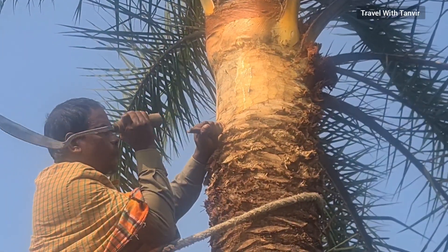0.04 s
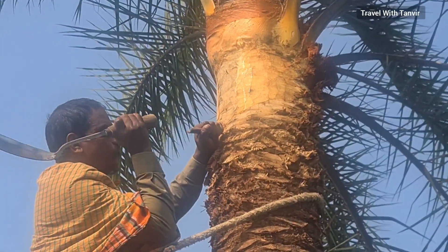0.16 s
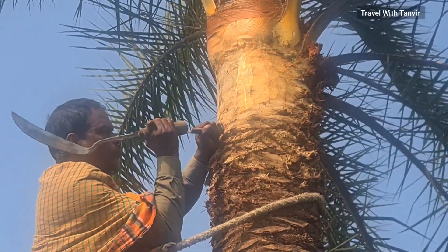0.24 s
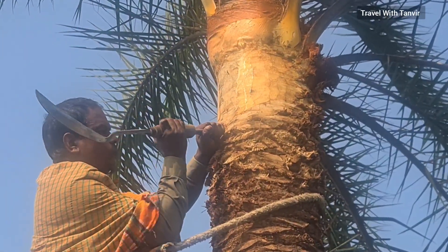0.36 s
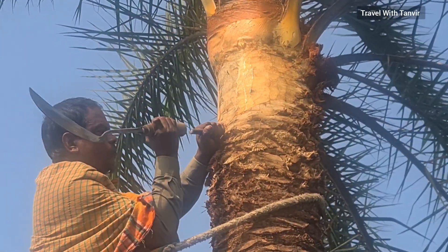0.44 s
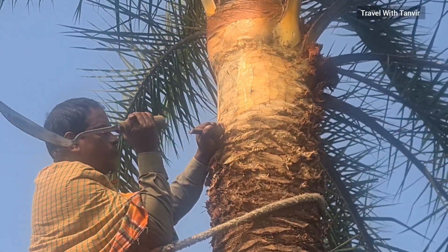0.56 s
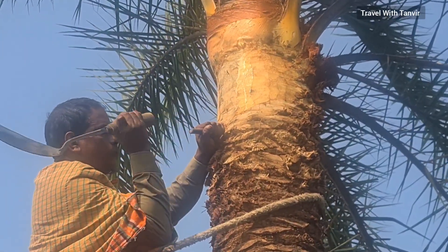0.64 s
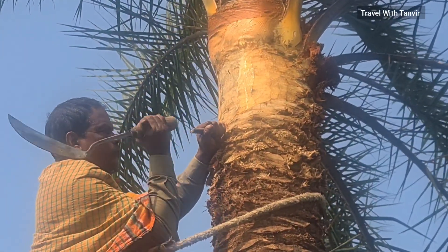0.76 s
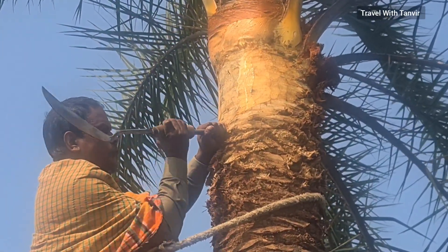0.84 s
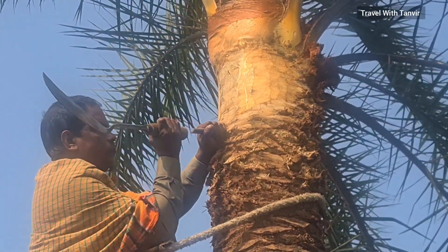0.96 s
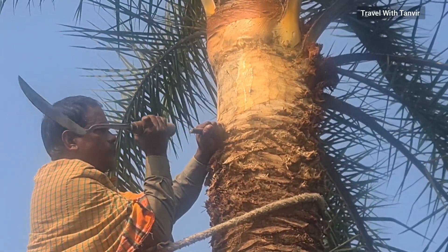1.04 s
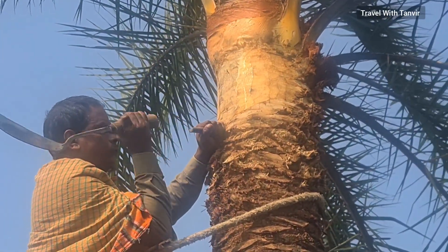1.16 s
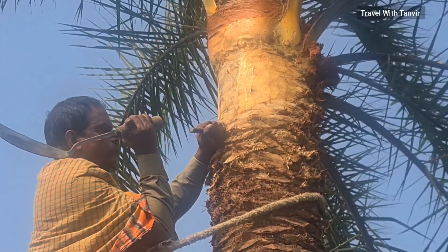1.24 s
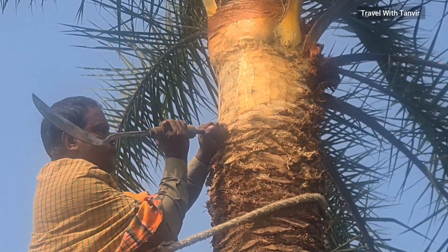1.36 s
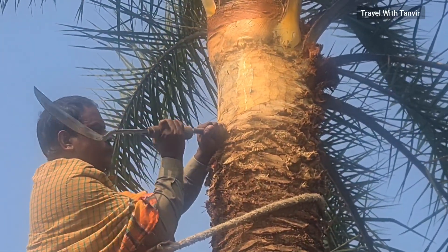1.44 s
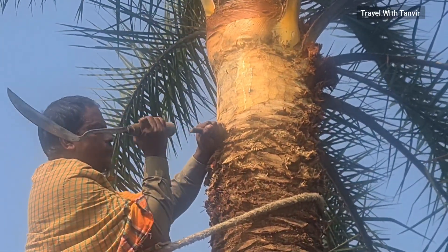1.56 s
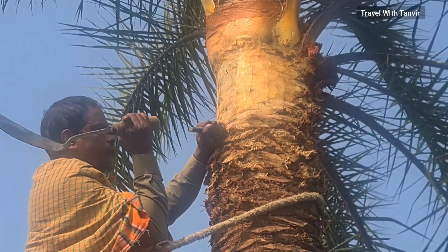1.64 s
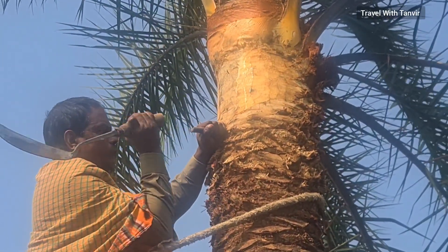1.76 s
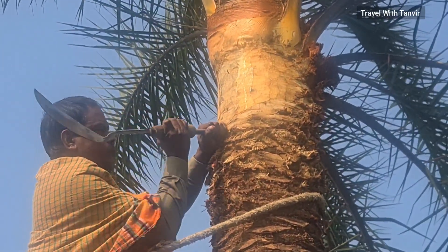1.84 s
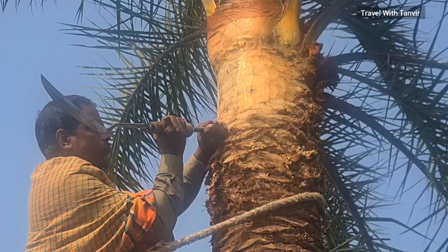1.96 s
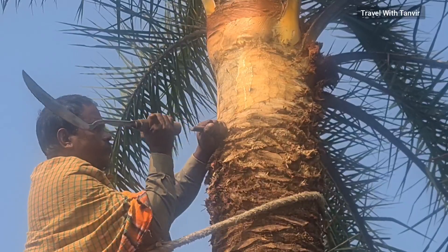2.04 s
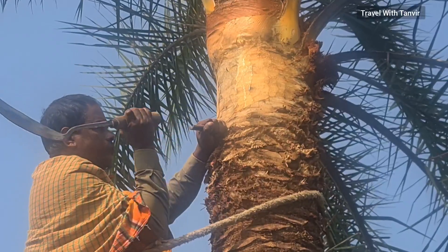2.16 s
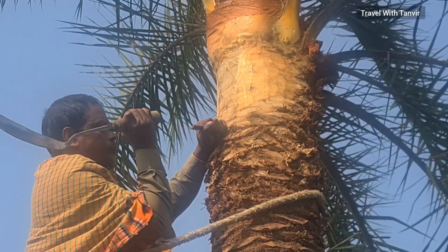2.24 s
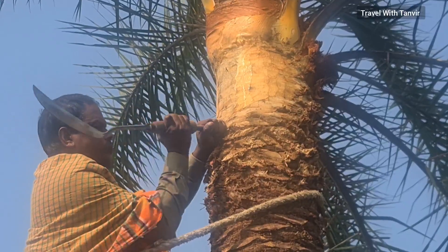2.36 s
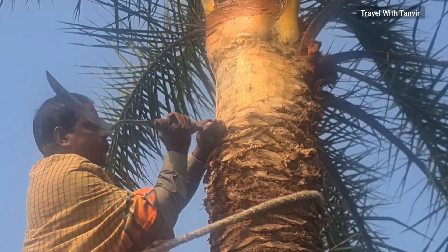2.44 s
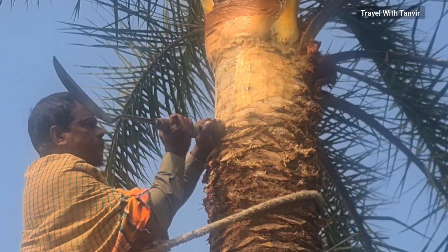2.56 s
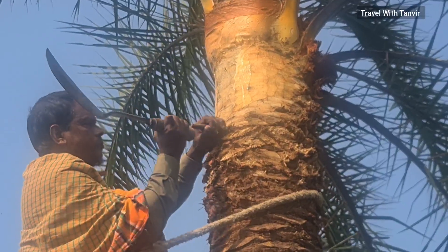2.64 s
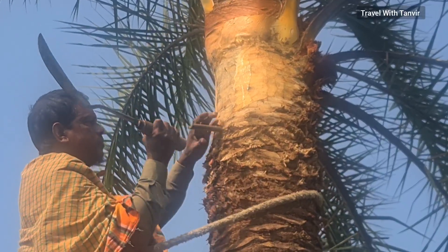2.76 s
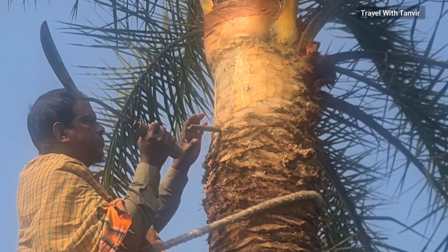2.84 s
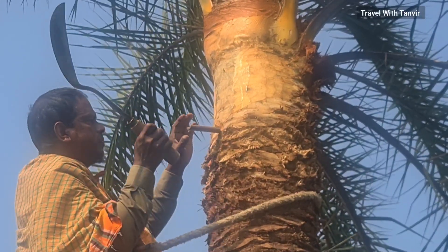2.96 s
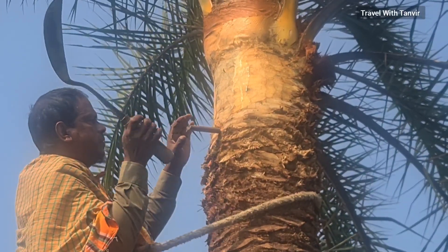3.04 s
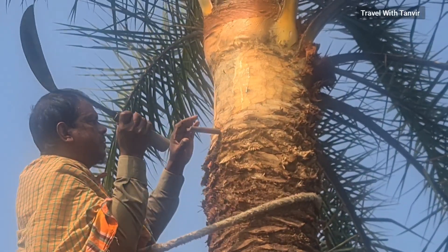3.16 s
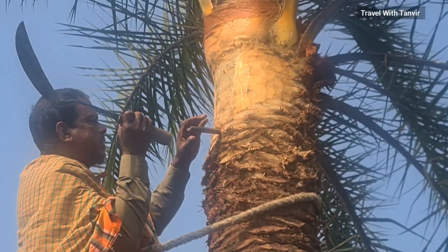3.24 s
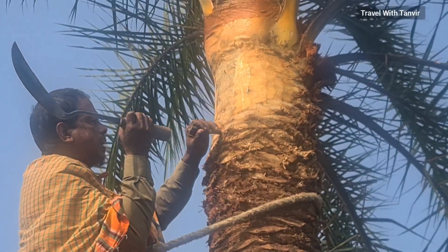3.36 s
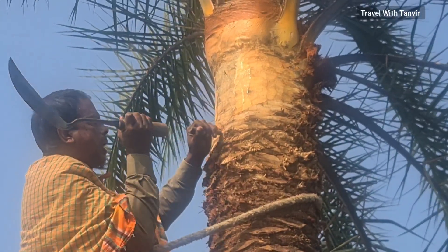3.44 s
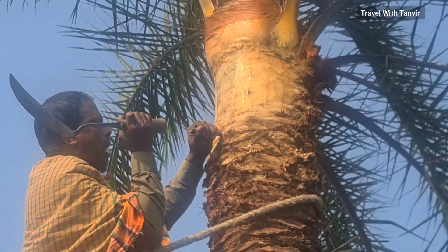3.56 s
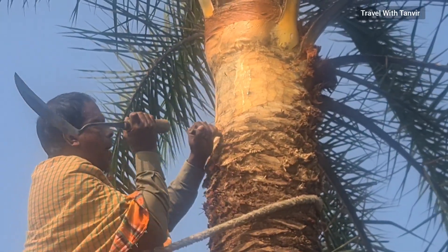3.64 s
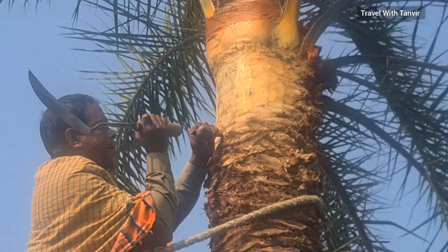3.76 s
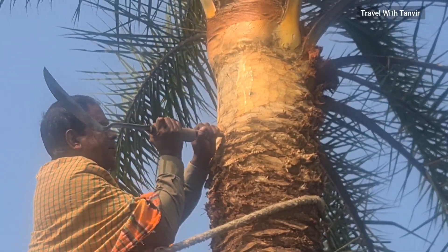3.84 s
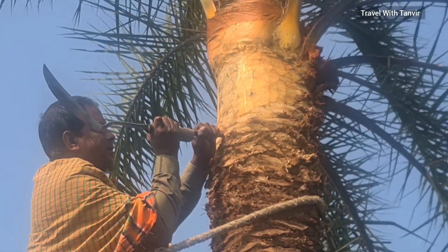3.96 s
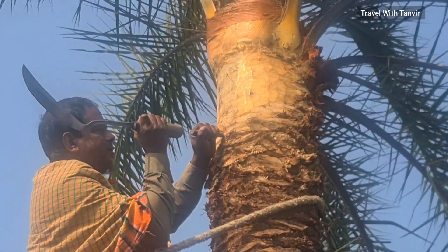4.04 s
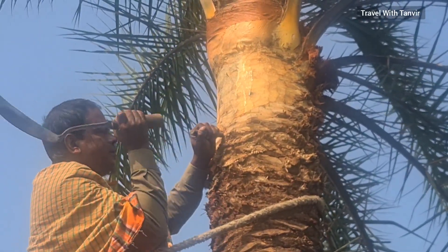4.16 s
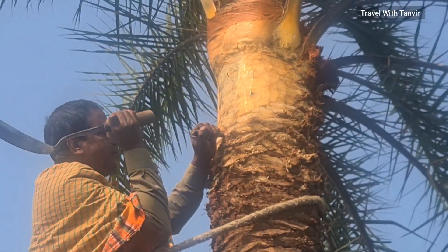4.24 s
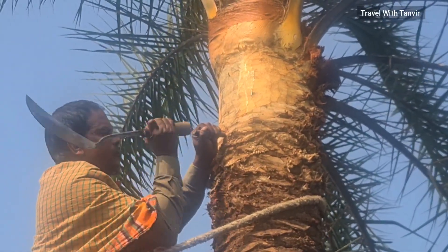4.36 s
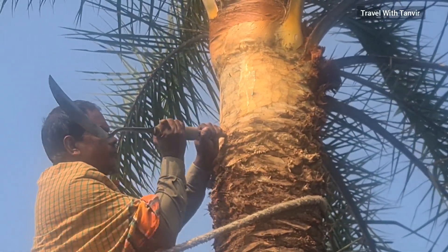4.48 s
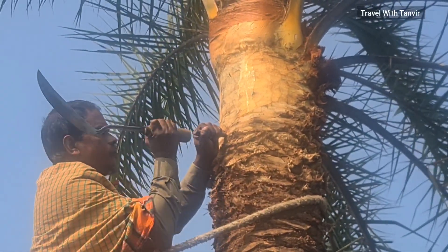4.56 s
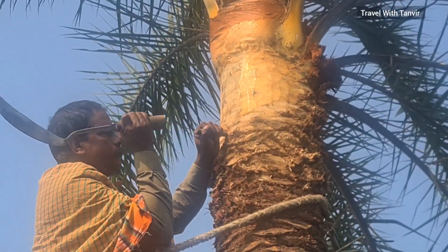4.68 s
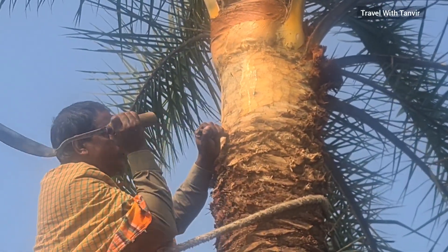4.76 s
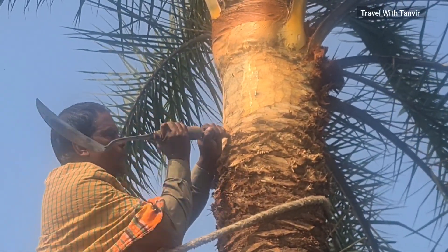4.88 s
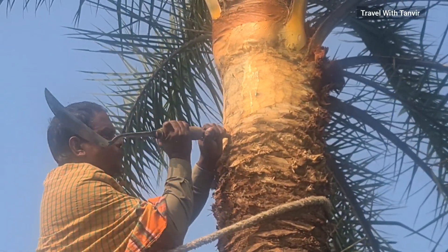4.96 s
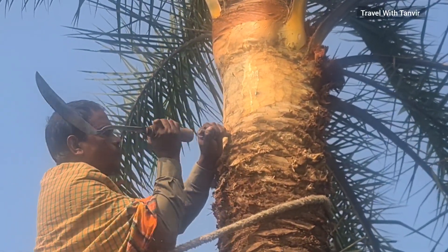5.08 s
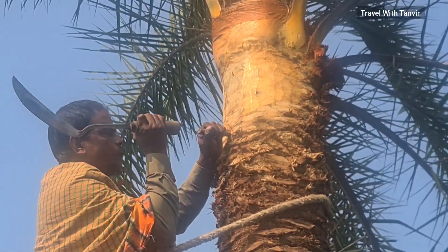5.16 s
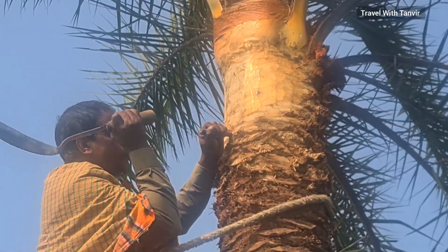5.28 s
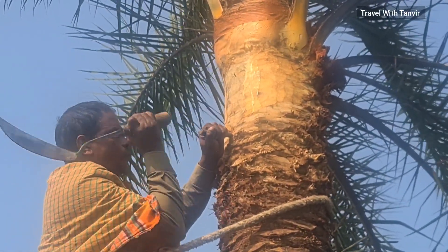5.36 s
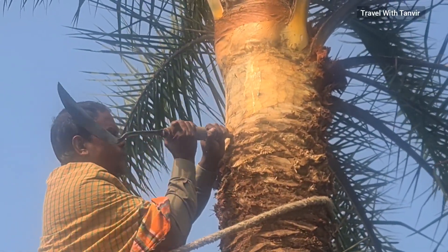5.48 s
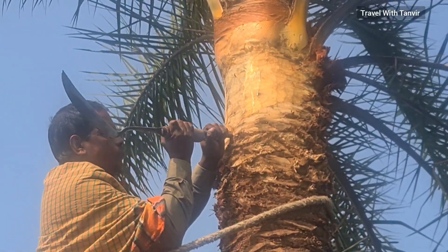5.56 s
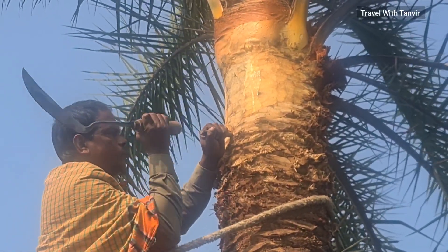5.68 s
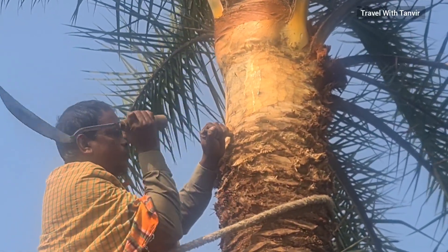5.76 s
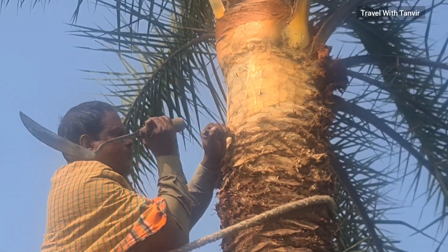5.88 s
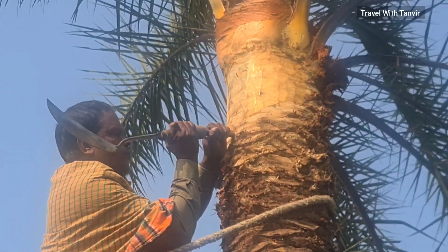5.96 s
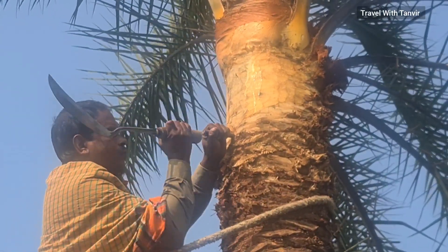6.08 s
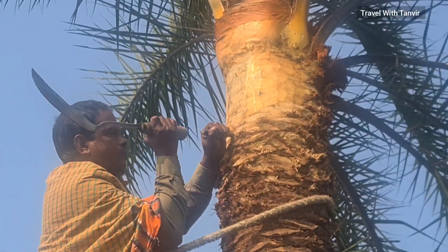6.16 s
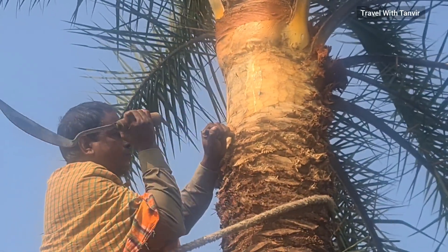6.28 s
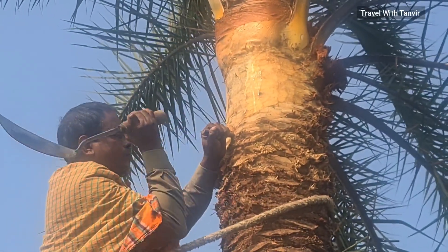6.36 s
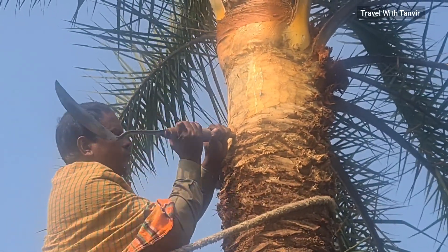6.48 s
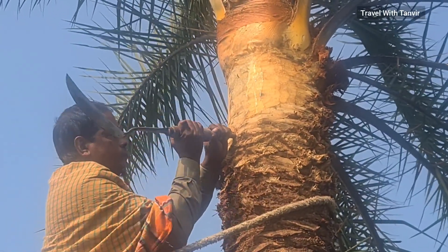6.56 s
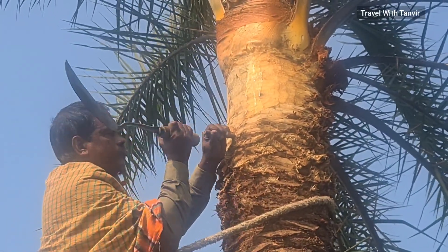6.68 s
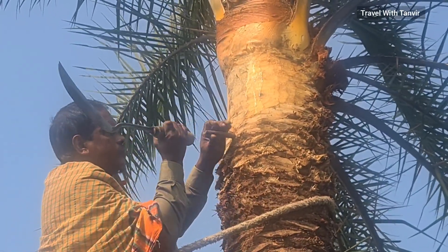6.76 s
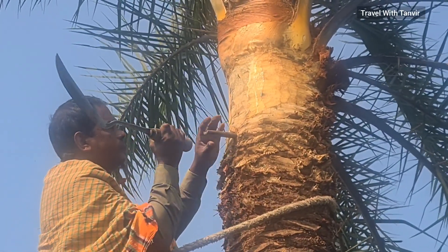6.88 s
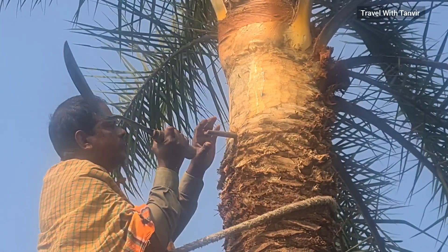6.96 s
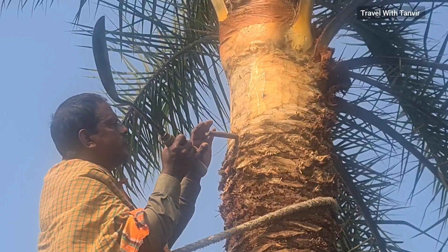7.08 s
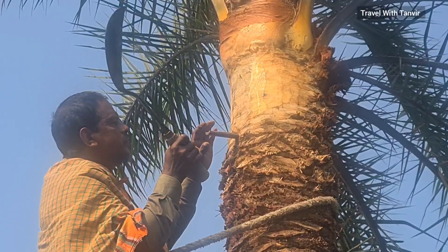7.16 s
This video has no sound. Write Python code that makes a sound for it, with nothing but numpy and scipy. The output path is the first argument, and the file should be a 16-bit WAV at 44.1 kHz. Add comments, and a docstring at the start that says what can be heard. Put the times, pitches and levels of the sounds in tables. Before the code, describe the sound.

Sharp wooden knocks, about two a second, drive a bamboo tube into a palm trunk outdoors, pausing midway, while small birds whistle nearby.

```python
"""Hard wooden knocks: a sickle's handle drives a bamboo spout into a date palm, five blows, a pause, a light tap, five more.
Each blow is a noise crack, decaying tube modes and a trunk thud; the knock deepens as the tube seats.
Filtered echoes and decaying noise throw it back from the ground, fronds and far surfaces.
Small birds whistle nearby in gliding sines, and noise bursts click as the tube is handled.
Behind lie hissing fronds, a low rumble and faint hiss of shaped noise, and a far engine, probably a water pump, in sines."""
import sys
import numpy as np
from scipy import signal
from scipy.fft import rfft, irfft, next_fast_len
from scipy.io import wavfile

SR = 44100
rng = np.random.default_rng(int(sys.argv[2]) if len(sys.argv) > 2 else 0)


def to_wav(sig):
    """Store sig (one row per channel, or 1-D mono) as 16-bit WAV at the path in sys.argv[1].

    Samples outside -1..1 are clipped; the rate is SR.
    """
    pcm = np.clip(np.atleast_2d(sig), -1, 1) * 32767
    pcm = np.round(pcm).astype(np.int16)
    wavfile.write(sys.argv[1], SR, pcm.T)  # frames by channels


N = 318402

# colour of the rumble and hiss, before their overall level is set: (frequency [Hz], relative density [dB per Hz])
BED_COLOUR = [(25, -18.5), (50, -1), (110, -9.5), (170, -18), (300, -26), (600, -30.5), (1050, -27),
              (2300, -36), (4000, -37), (5200, -49), (6700, -35.5), (7300, -27), (7600, -39), (7950, -61),
              (16000, -60.5)]
# how alike the rumble and hiss are at left and right: (frequency [Hz], correlation [-1 to 1])
BED_LIKENESS = [(60, 0.95), (180, 0.98), (550, 0.41), (1650, -0.0096), (4970, -0.16), (15000, 0.13)]
# exhaust of the far engine, before fading: (multiple of the firing rate, level [dB rms])
EXHAUST_ORDERS = [(4, -51), (5, -51), (6, -48), (7, -54), (9, -57.5), (12, -61)]
# faint machine whine, before fading: (frequency [Hz], level [dB rms])
WHINE_TONES = [(398.4, -70), (748.3, -74), (845.2, -76), (872.1, -72), (995.9, -70), (1244, -73)]
# a breeze stirs the fronds, before flutter: (time [s], level [dB rms])
BREEZE = [(0, -74), (1, -69), (1.7, -61.5), (4.8, -65), (5.6, -67.5), (7.2, -65)]
# colour of the frond hiss: (frequency [Hz], relative density [dB per Hz])
FROND_COLOUR = [(1500, -53), (3000, 1), (5000, 5.5), (6800, 1.5), (7600, -5), (8200, -40), (11000, -15),
                (16000, -18)]
# slurred whistles of the nearest bird: (time [s], length [s], start [Hz], end [Hz], level [dB])
WHISTLES = [(0.799, 0.14, 4070, 4950, -46), (2.246, 0.16, 4090, 5400, -44.5),
            (2.572, 0.047, 5410, 5400, -56), (4.149, 0.14, 3070, 3960, -55.5),
            (4.253, 0.13, 3920, 5310, -45.5), (4.588, 0.11, 5010, 5130, -45.5),
            (4.672, 0.046, 5500, 5570, -43.5), (4.732, .06, 5600, 5540, -59),
            (4.887, 0.19, 4260, 5350, -45), (5.37, 0.17, 4380, 4700, -55),
            (6.067, 0.095, 4460, 5300, -52.5), (6.331, 0.06, 5650, 5640, -60)]
# short, high, rising chirps: (time [s], level [dB])
CHIRPS = [(2.159, -44), (4.215, -56.5), (5.455, -51)]
# a second bird's cheep, dipping and rising again: (time [s], level [dB])
CHEEPS = [(3.064, -50.5), (3.441, -53), (3.778, -52.5)]
# quick falling chips: (time [s], level [dB])
CHIPS = [(2.881, -58), (3.035, -53), (5.84, -47.5)]
# small ticks as the tube is handled: (time [s], relative level [dB])
TICKS = [(3.374, -45), (3.4233, -38.5), (4.295, -55.5), (7.121, -51)]
# far reflectors, each returning one band: (delay [s], level [dB], centre [Hz], width [Hz])
ECHOES = [(0.0878, -19.5, 758, 56), (0.09, -35, 2200, 895), (0.1348, -19.5, 510, 50.4)]
# scatter from fronds and ground: (frequency [Hz], early level [dB], late level [dB], late t60 [s])
SCATTER = [(260, 5, -9.5, 1), (533, -10, -23.5, 0.92), (900, -13.5, -34, 1), (2670, -7.5, -23, 0.52),
           (6450, -2, -19, 0.5), (9000, -4, -8.5, 0.25), (14800, -16, -7, 0.19)]
# relative colour of the contact crack: (frequency [Hz], density [dB per Hz])
CRACK_COLOUR = [(400, -38), (1500, -6), (3000, 3.5), (4300, -3), (6300, -2.5), (7500, -10.5), (10000, -15),
                (12500, -13), (16000, -22.5)]
# modes of tube, handle and trunk, before the low cut:
# (frequency [Hz], level with the tube shallow [dB], level with it deep [dB], t60 [s])
MODES = [(396.7, -27.5, -31, 0.12), (513, -19.5, -11.5, 0.038), (616, -11, -4, 0.014),
         (901, -15.5, -10, 0.041), (1052, -22, -16, 0.036), (1156, -21.5, -16, 0.037),
         (1415, -18.5, -18.8, 0.035), (1597, -20.5, -18, 0.021), (1907, -13, -17.5, 0.016),
         (2187, -17.5, -25, 0.017), (2379, -28.5, -18.5, 0.022), (2836, -19, -13.5, 0.014),
         (3160, -16, -16.5, 0.014), (3580, -12, -14.5, 0.0072), (4026, -13.5, -18, 0.009),
         (4730, -18.5, -16.5, 0.0079), (5720, -17, -20, 0.0038), (6920, -12, -36, 0.0044)]
# dull trunk modes, relative to the thud level: (frequency [Hz], level [dB], t60 [s])
TRUNK_MODES = [(242, -9.5, 0.04), (497, 2, 0.015)]
# the blows: (time [s], force [dB], crack relative to the blow [dB], brightness above 1.5 kHz [dB per octave])
BLOWS = [(.3424, 1.5, -1, -8), (0.8792, 1.5, -1.5, .5), (1.3915, 2, -2, 0), (1.8995, 1.5, -1, 1.2),
         (2.398, 1.6, 0, 1), (3.9111, -14.5, -26, -7), (4.4572, 2.45, -2.5, 0.5), (4.9791, 3, -2.5, -0.5),
         (5.4973, 3.5, -5.5, 0), (6.011, 4, -6.5, -2), (6.524, 3, -6.5, -1.5)]
# level of the blows at the left relative to the right: (frequency [Hz], level [dB])
LEFT_TILT = [(200, 0.7), (1200, 2), (2800, -2), (5500, -8), (10000, -5.5), (14000, -11)]

WHISTLE_BOW = 0.19  # share of its climb by which a whistle is ahead at half time
CHIRP_LENGTH_S, CHIRP_START_HZ, CHIRP_END_HZ = 0.054, 5400, 6400
CHEEP_LENGTH_S, CHEEP_HZ, CHEEP_DIP_HZ = 0.0507, 3450, 473
CHIP_LENGTH_S, CHIP_TOP_HZ, CHIP_END_HZ = 0.023, 7400, 5040
# quaver as a share of the pitch: whistles and cheeps are nearly pure, chirps and chips buzz
WHISTLE_WAVER, CHIRP_WAVER = 0.021, 0.051
BOUNCE_S = 0.0087  # delay of the near bounce
# depth of the tube (about 0 shallow, 1 deep): at the start, and what a blow of 0 dB adds
START_DEPTH, DRIVE_PER_BLOW = 0.14, 0.081
# thud relative to the blow: shallow [dB], gain as the tube seats [dB per depth], loss [dB per dB of force]
THUD_DB, THUD_SEATED_DB, THUD_LOSS = -37, 20, 1.17
EDGE_HZ = 16200  # cutoff of the final low-pass


def amp(db):
    """Decibels to gain."""
    return 10 ** (np.asarray(db) / 20)


def unit(x):
    """Scales to rms 1."""
    return x / np.sqrt(np.mean(x ** 2) + 1e-20)


def read(table, hz, axis=1):
    """One column of a table, joined by lines over log frequency."""
    columns = np.transpose(table)
    return np.interp(np.log(hz + 1), np.log(columns[0] + 1), columns[axis])


def colour(x, table, axis=1):
    """Filters x by a table of dB over frequency."""
    length = x.shape[-1]
    size = next_fast_len(length + 512)
    gain = amp(read(table, np.fft.rfftfreq(size, 1 / SR), axis=axis))
    return irfft(rfft(x, size) * gain, size)[..., :length]


def cut(x, hz, kind, order=2):
    """Causal low-pass or high-pass."""
    sos = signal.butter(order, min(hz, SR / 2 - 1), kind, fs=SR, output="sos")
    return signal.sosfilt(sos, x)


def add(mix, s, sound):
    """Mixes a sound in at time s."""
    part = mix[..., max(round(s * SR), 0):][..., :sound.shape[-1]]
    part += sound[..., :part.shape[-1]]


def delayed(x, s):
    """The same sound s seconds later."""
    out = np.zeros_like(x)
    add(out, s, x)
    return out


def drift(rate, size=N):
    """Random wander: normal values drawn at rate per second, joined by lines."""
    at = np.arange(size) * rate / SR
    return np.interp(at, np.arange(4096), rng.standard_normal(4096))


def rumble_and_hiss(level_db=-46, swell_db=2.13):
    """Low rumble of open country under a faint hiss: shaped noise, more alike in the bass, swelling."""
    a, b = rfft(rng.standard_normal((2, N)))
    hz = np.fft.rfftfreq(N, 1 / SR)
    same = np.clip(read(BED_LIKENESS, hz), -1, 1)
    right = same * a + np.sqrt(1 - same ** 2) * b
    noise = irfft(np.array([a, right]) * amp(read(BED_COLOUR, hz)), N)
    return amp(level_db + swell_db * drift(2.79)) * unit(cut(noise, 21, "high"))


def engine(firing_hz=12.4, wander=0.0063, fade_db=3.0, whine_wander=0.00237):
    """Only low exhaust orders and a thin whine carry this far, fading in the moving air."""
    turns = np.cumsum(firing_hz * (1 + wander * drift(1.913))) / SR
    thud, whine = 0, 0
    for order, db in EXHAUST_ORDERS:
        level = amp(db + fade_db * drift(6.4))
        thud = thud + level * np.sin(2 * np.pi * (round(order) * turns + rng.random()))
    for hz, db in WHINE_TONES:
        level = amp(db + fade_db * drift(4.4))
        cycles = np.cumsum(hz * (1 + whine_wander * drift(12))) / SR
        whine = whine + level * np.sin(2 * np.pi * cycles)
    return np.sqrt(2) * (thud + whine)  # sine rms to peak


def rustle(flutter_db=1.5):
    """A thin, fluttering hiss of palm fronds: shaped noise following the breeze."""
    level_db = np.interp(np.arange(N) / SR, *np.transpose(BREEZE)) + flutter_db * drift(14)
    return amp(level_db) * unit(colour(rng.standard_normal((2, N)), FROND_COLOUR))


def foliage(x, direct_db=-2, wet_db=-7, t60=0.58):
    """Leaves smear sounds from deep in the trees: a decaying noise tail joins the direct sound."""
    t = np.arange(SR // 2) / SR
    tail = rng.standard_normal((2, len(t))) * amp(-60 * t / t60)
    smeared = signal.fftconvolve(x, tail / np.linalg.norm(tail[0]), axes=1)[:, :N]
    return amp(direct_db) * x + amp(wet_db) * smeared


def note(length, first_hz, last_hz, bow_hz, db, waver, flutter_db=4):
    """A thin note gliding along an arc, bow_hz off the straight line at half time, with a quaver."""
    u = np.linspace(0, 1, int(length * SR))
    arc_hz = first_hz + (last_hz - first_hz) * u + bow_hz * (1 - (2 * u - 1) ** 2)
    hz = arc_hz * (1 + waver * drift(671, size=len(u)))
    swell = np.sin(np.pi * u).clip(0) * amp(db + flutter_db * drift(90, size=len(u)))
    return swell * np.sin(2 * np.pi * np.cumsum(hz) / SR)


def birds(pan_db=-1):
    """Slurred whistles, rising chirps, dipping cheeps and falling chips, set slightly to the right."""
    out = np.zeros(N)
    for s, length, first_hz, last_hz, db in WHISTLES:
        bow_hz = WHISTLE_BOW * (last_hz - first_hz)
        add(out, s, note(length, first_hz, last_hz, bow_hz, db, WHISTLE_WAVER))
    for s, db in CHIRPS:
        add(out, s, note(CHIRP_LENGTH_S, CHIRP_START_HZ, CHIRP_END_HZ, 0, db, CHIRP_WAVER))
    for s, db in CHEEPS:
        add(out, s, note(CHEEP_LENGTH_S, CHEEP_HZ, CHEEP_HZ, -CHEEP_DIP_HZ, db, WHISTLE_WAVER))
    for s, db in CHIPS:
        add(out, s, note(CHIP_LENGTH_S, CHIP_TOP_HZ, CHIP_END_HZ, 0, db, CHIRP_WAVER))
    return out * amp([[pan_db / 2], [-pan_db / 2]])


def ticks(decay_s=0.0056):
    """Dry, thin clicks of bamboo against bark: treble noise dying in milliseconds."""
    out, t = np.zeros((2, N)), np.arange(SR // 30) / SR
    for s, db in TICKS:
        hiss = cut(rng.standard_normal((2, len(t))), 5300, "high")
        add(out, s, amp(db) / 2 * hiss * np.exp(-t / decay_s))
    return out


def reflections(x, bounce_s, bounce_db=-8, bounce_edge_hz=850):
    """One near bounce, strongest in the treble, and narrow echoes from far surfaces."""
    out = amp(bounce_db) * delayed(cut(x, bounce_edge_hz, "high", order=1), bounce_s)
    for s, db, hz, width_hz in ECHOES:
        band = signal.lfilter(*signal.iirpeak(hz, hz / width_hz, fs=SR), x)
        out += amp(db) * delayed(band, s)
    return out


def scatter(x, early_t60=0.091, onset_s=0.0052, apart_hz=1200):
    """Quick scatter from the fronds and a faint open-air tail: coloured noise convolved with the sound."""
    t = np.arange(SR // 2) / SR
    mid, side = rng.standard_normal((2, 2, len(t)))
    side = cut(side, apart_hz, "high", order=1)  # left and right share the bass
    early, late = np.stack([mid + side, mid - side], 1)
    early = early * amp(-60 * t / early_t60) * (1 - np.exp(-(t / onset_s) ** 2))
    # the late part dies at a different rate in each band
    hz, at, bands = signal.stft(late, SR, nperseg=256)
    fade = amp(-60 * at / read(SCATTER, hz, axis=3)[:, None])
    late = signal.istft(bands * fade, SR, nperseg=256)[1][:, :len(t)]
    late = late * (1 - np.exp(-t / 0.005))
    early_tail = colour(early / np.linalg.norm(early[0]), SCATTER, axis=1)
    late_tail = colour(late / np.linalg.norm(late[0]), SCATTER, axis=2)
    return signal.fftconvolve(x, early_tail + late_tail, axes=1)[:, :x.shape[1]]


def crack(burst_s=0.00086, rise_s=0.00085, same=0.91):
    """Fibres crush at the contact: a millisecond noise burst, its spectrum evened out, then coloured."""
    t = np.arange(SR // 8) / SR
    shared, apart = rng.standard_normal((2, len(t)))
    same = np.clip(same, 0, 1)
    pair = np.array([shared, same * shared + np.sqrt(1 - same ** 2) * apart])
    burst = pair * np.exp(-t / burst_s) * (1 - np.exp(-t / rise_s)) ** 2
    spectrum = rfft(burst, 2 * len(t))
    size = abs(spectrum)
    even = irfft(spectrum / (size + 0.1 * size.mean()))[:, :len(t)]
    sound = colour(even, CRACK_COLOUR)
    return sound / np.linalg.norm(sound[0])


def blow(crack_db, depth, bright_db, thud_db, burst_db=2.5, vary_db=-0.2):
    """A short crack of contact, the ring of the tube, and a thud from the trunk as decaying modes."""
    t = np.arange(SR // 8) / SR
    hz, shallow_db, deep_db, t60 = np.transpose(MODES)[:, :, None]
    # each blow lands a little differently, which changes the upper modes most
    upper_octaves = np.log2(np.maximum(hz / 1500, 1))
    slope_db = bright_db + vary_db * rng.standard_normal(hz.shape)
    level_db = shallow_db + depth * (deep_db - shallow_db) + upper_octaves * slope_db
    # struck at one end and heard from the other, neighbouring modes swing in opposite senses
    sense = (-1) ** np.arange(len(MODES))[:, None]
    ring = (sense * amp(level_db - 60 * t / t60) * np.sin(2 * np.pi * hz * t)).sum(0)
    thud = 0
    for mode_hz, db, decay in TRUNK_MODES:
        thud = thud + amp(thud_db + db - 60 * t / decay) * np.sin(2 * np.pi * mode_hz * t)
    return cut(ring, 724, "high") + cut(thud, 276, "high") + amp(burst_db + crack_db) * crack()


def knocks():
    """Each blow drives the tube deeper by its force; all are brighter and slightly earlier at the right."""
    out, depth = np.zeros((2, N)), START_DEPTH
    for s, force_db, crack_db, bright_db in BLOWS:
        thud_db = THUD_DB + THUD_SEATED_DB * depth - THUD_LOSS * force_db
        struck = amp(force_db) * blow(crack_db, depth, bright_db, thud_db)
        sound = np.pad(struck, ((0, 0), (0, SR // 2)))  # room for the tail
        add(out, s, sound + reflections(sound, BOUNCE_S) + scatter(sound))
        depth = depth + DRIVE_PER_BLOW * amp(force_db)
    # half of the tilt goes to each side
    left_tilt = [(hz, db / 2) for hz, db in LEFT_TILT]
    right_tilt = [(hz, -db) for hz, db in left_tilt]
    return np.array([colour(delayed(out[0], 1 / SR), left_tilt), colour(out[1], right_tilt)])


def scene():
    """Knocks, ticks and birds among the trees, over the far background."""
    handling = ticks()
    background = rumble_and_hiss() + engine() + rustle()
    return background + foliage(birds()) + handling + scatter(handling) + knocks()


def record(dry, ceiling=2.0):
    """The sharpest peaks are rounded off; then a steep low-pass limits the band."""
    held = dry / (1 + (dry / ceiling) ** 4) ** (1 / 4)
    low_pass = signal.firwin(255, EDGE_HZ, window=("kaiser", 8), fs=SR)
    return signal.oaconvolve(held, low_pass[None], "same")


dry = scene()
out = record(dry)
to_wav(out)
```